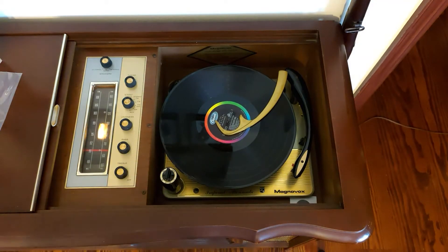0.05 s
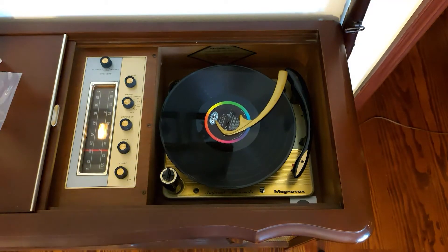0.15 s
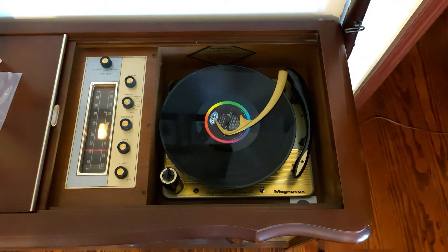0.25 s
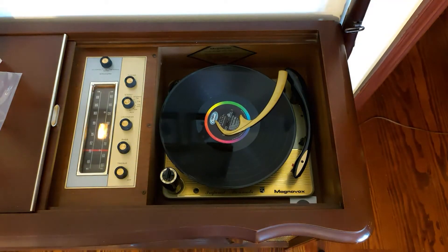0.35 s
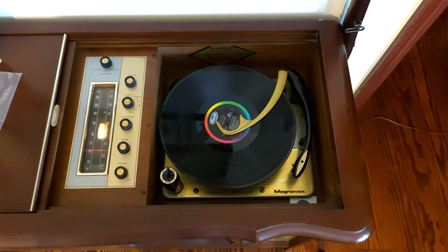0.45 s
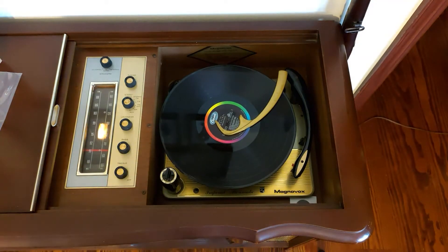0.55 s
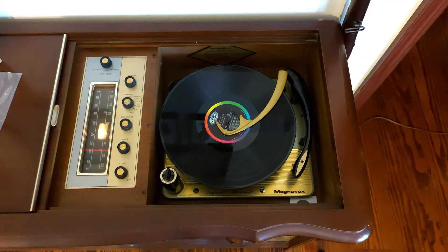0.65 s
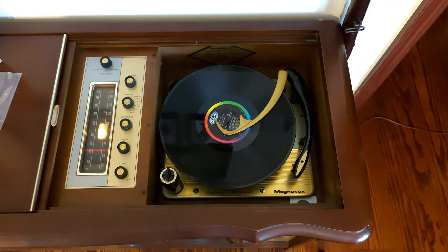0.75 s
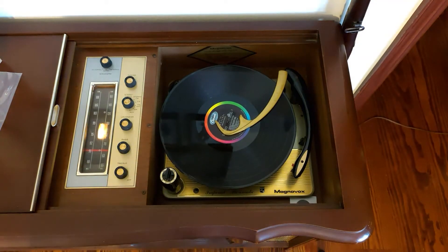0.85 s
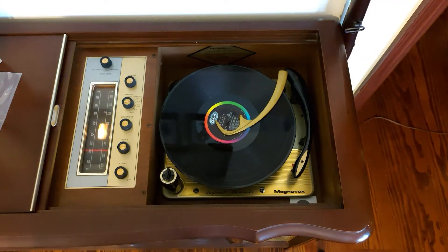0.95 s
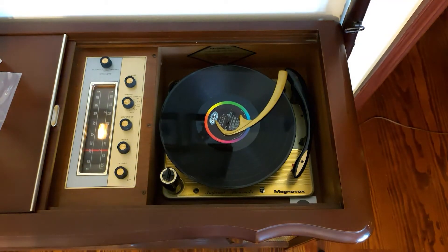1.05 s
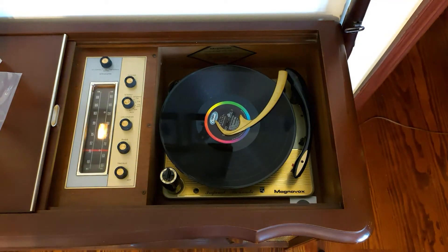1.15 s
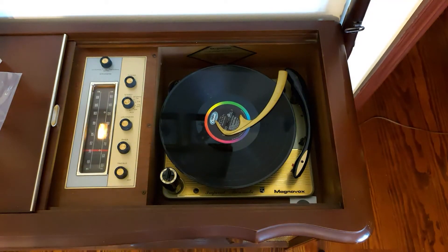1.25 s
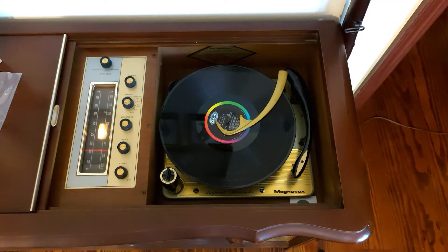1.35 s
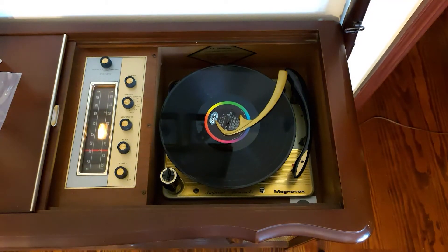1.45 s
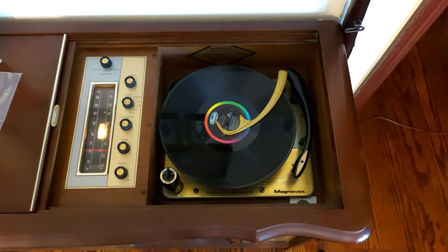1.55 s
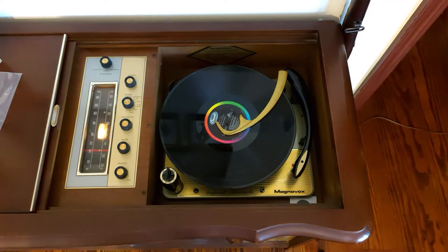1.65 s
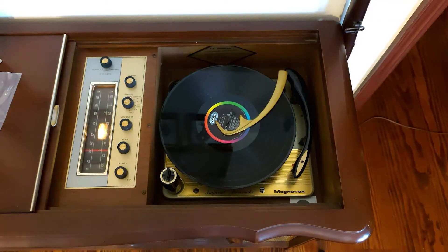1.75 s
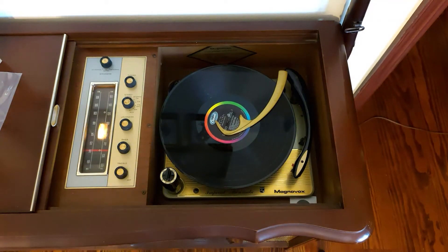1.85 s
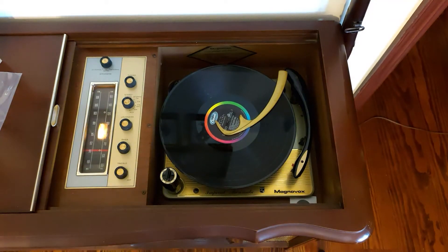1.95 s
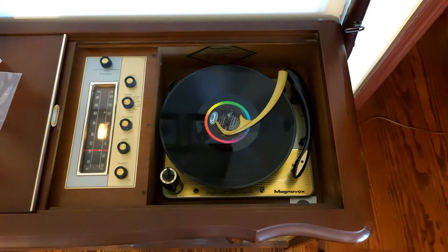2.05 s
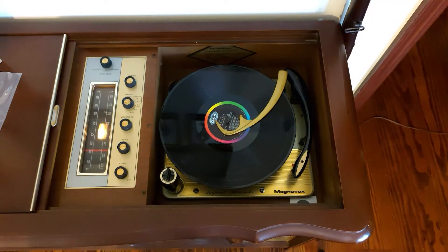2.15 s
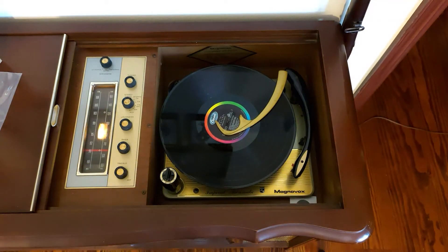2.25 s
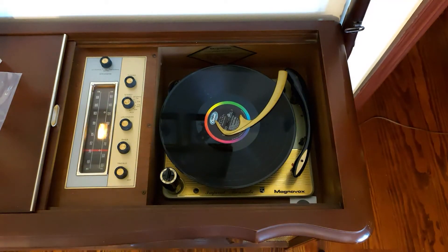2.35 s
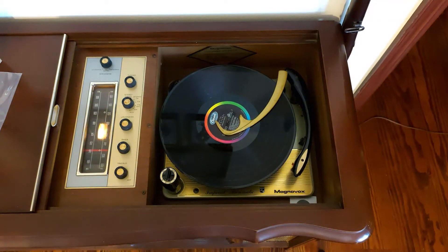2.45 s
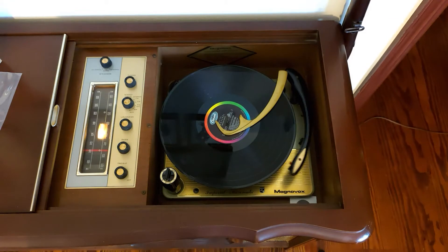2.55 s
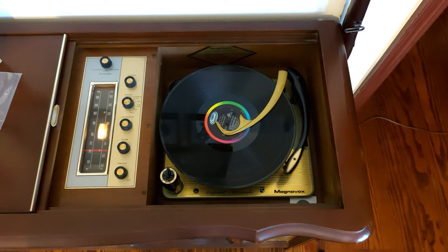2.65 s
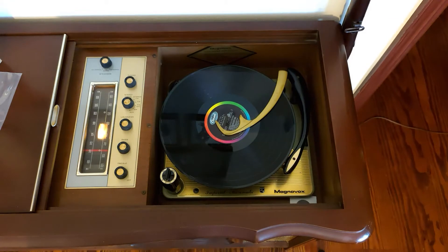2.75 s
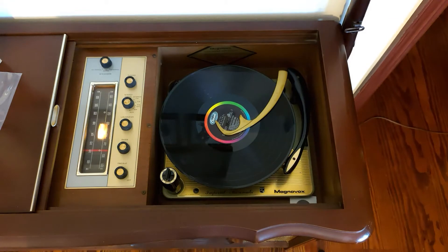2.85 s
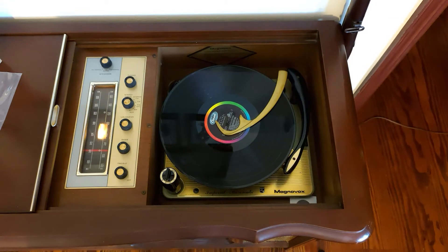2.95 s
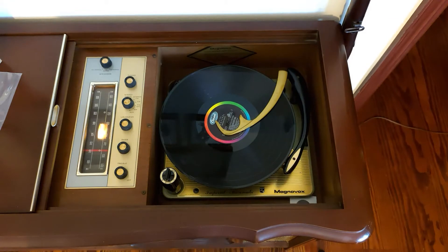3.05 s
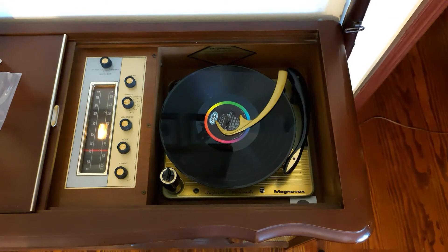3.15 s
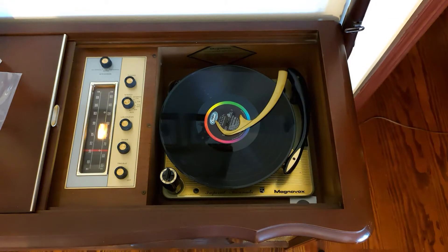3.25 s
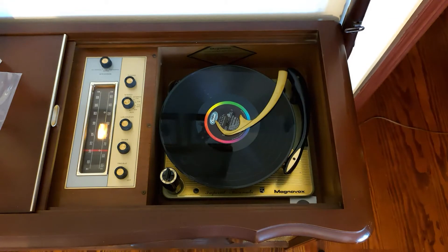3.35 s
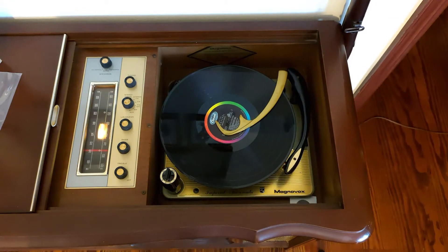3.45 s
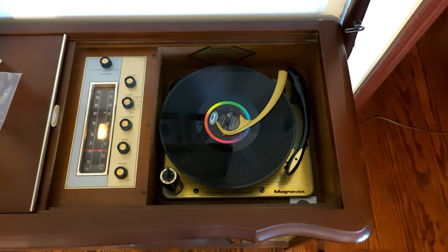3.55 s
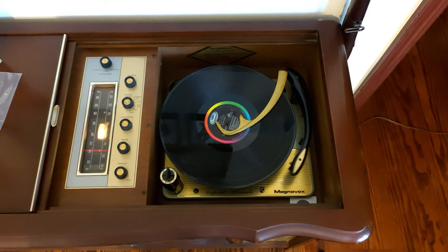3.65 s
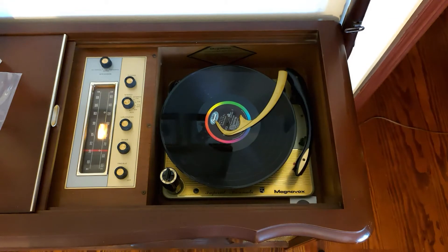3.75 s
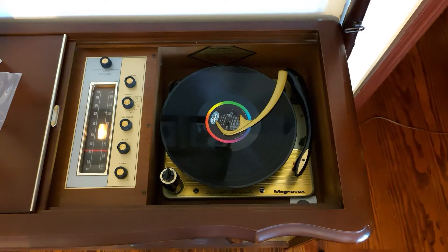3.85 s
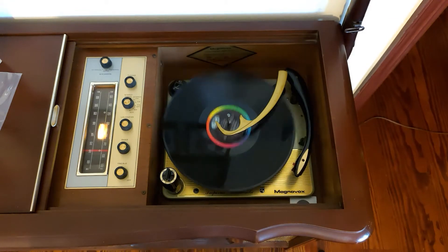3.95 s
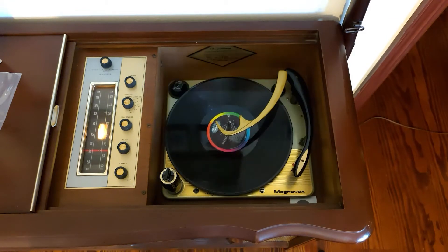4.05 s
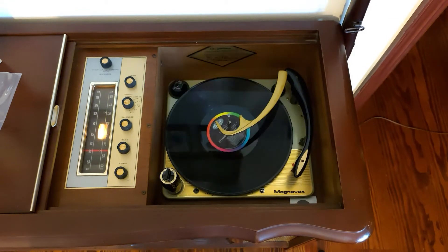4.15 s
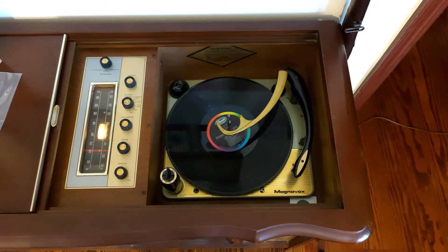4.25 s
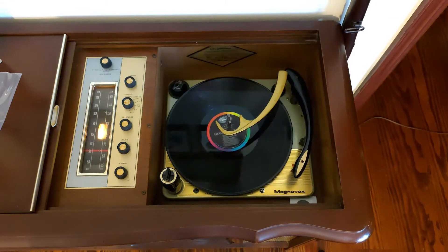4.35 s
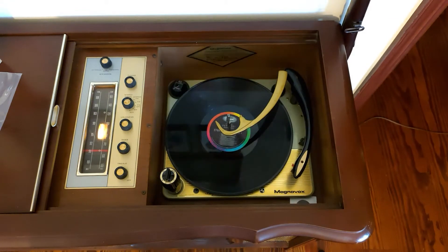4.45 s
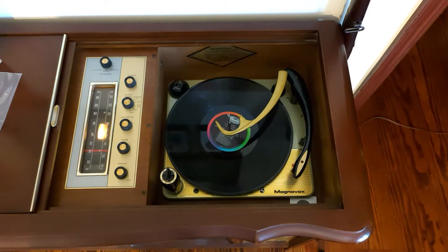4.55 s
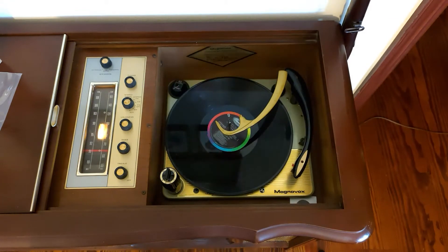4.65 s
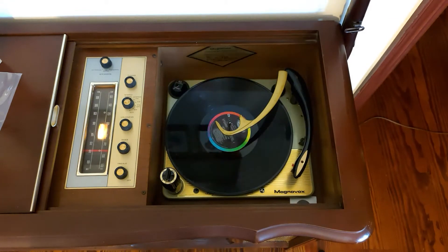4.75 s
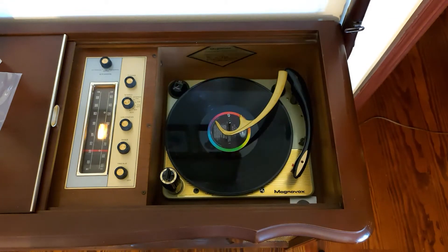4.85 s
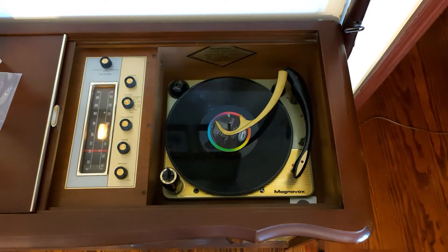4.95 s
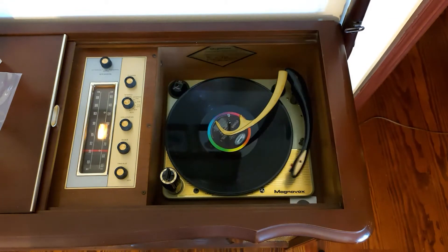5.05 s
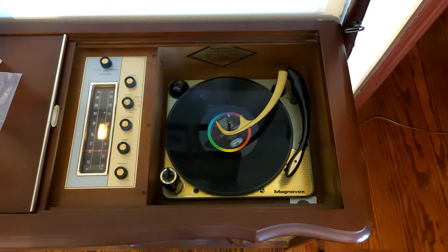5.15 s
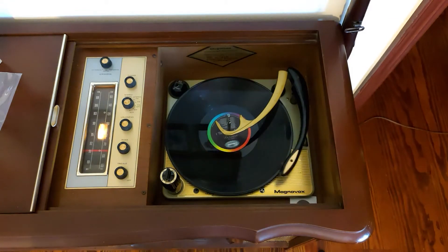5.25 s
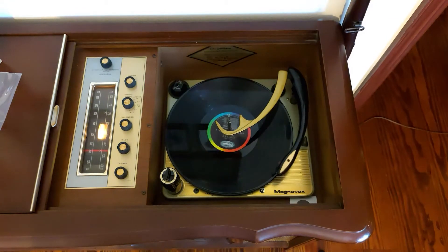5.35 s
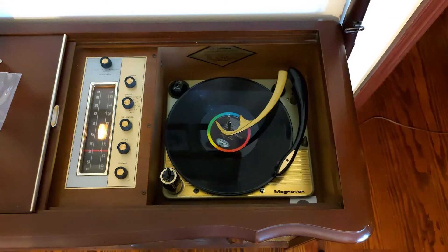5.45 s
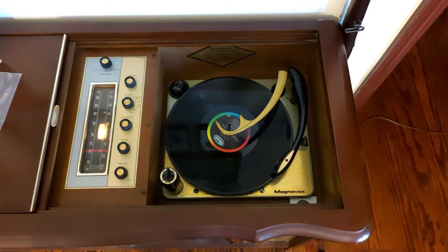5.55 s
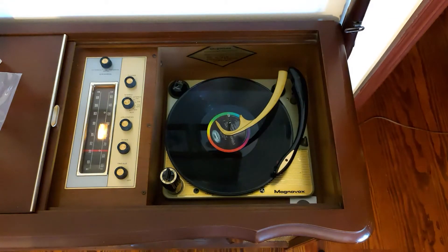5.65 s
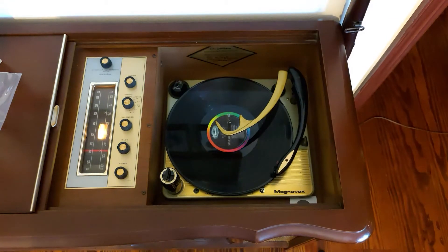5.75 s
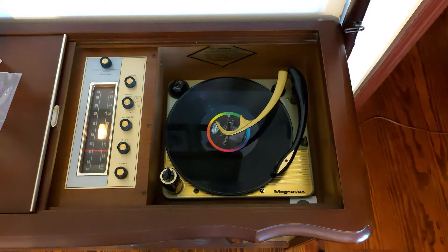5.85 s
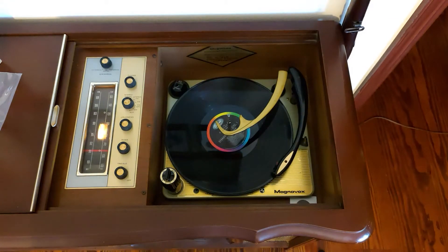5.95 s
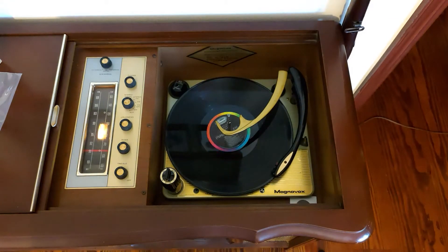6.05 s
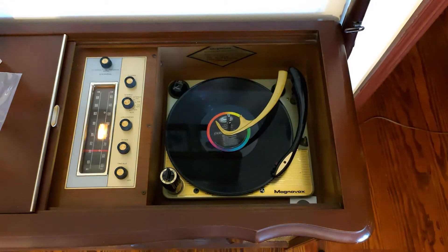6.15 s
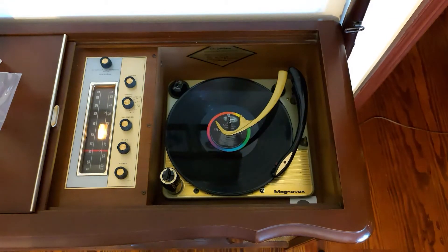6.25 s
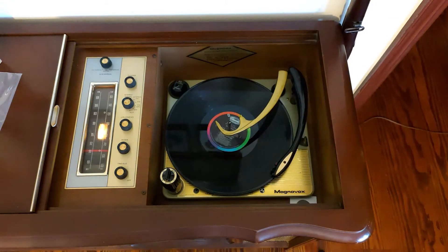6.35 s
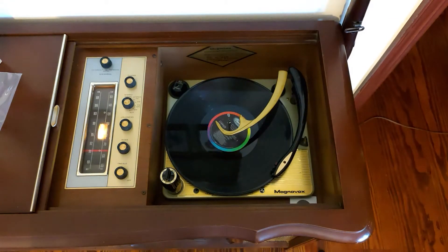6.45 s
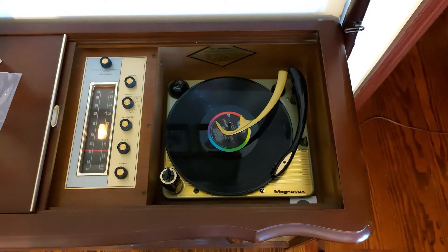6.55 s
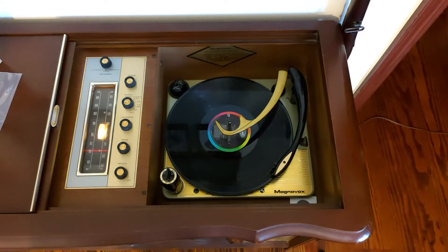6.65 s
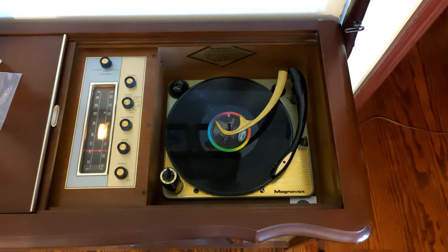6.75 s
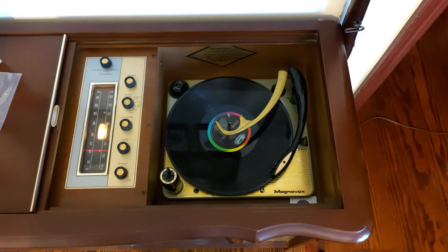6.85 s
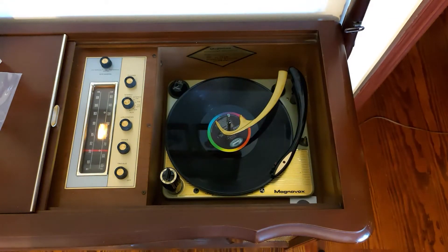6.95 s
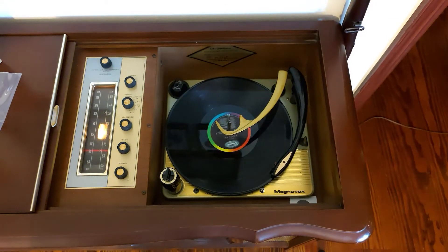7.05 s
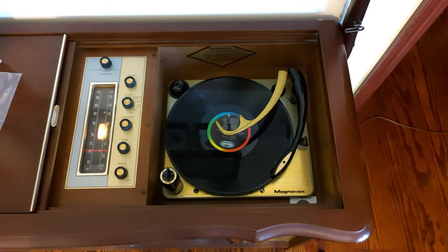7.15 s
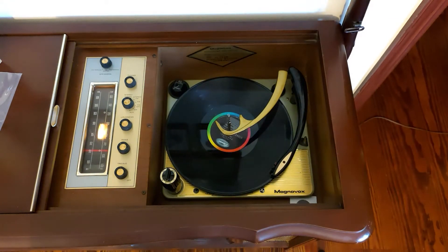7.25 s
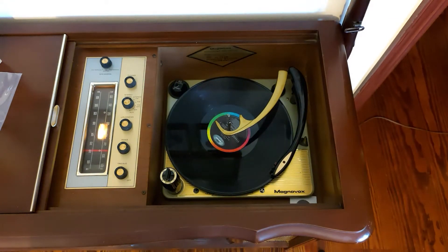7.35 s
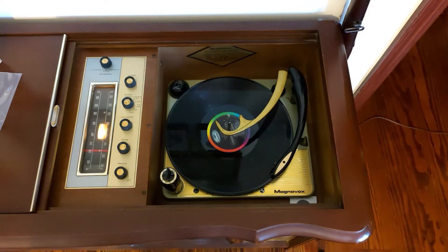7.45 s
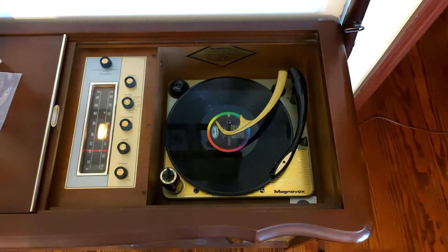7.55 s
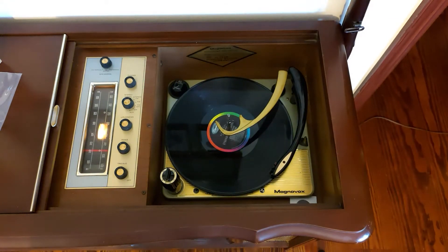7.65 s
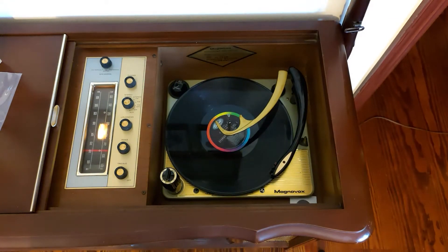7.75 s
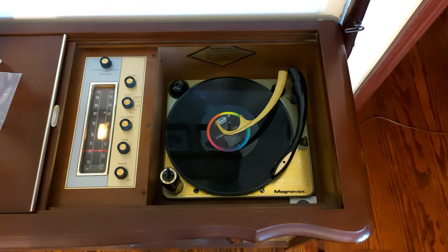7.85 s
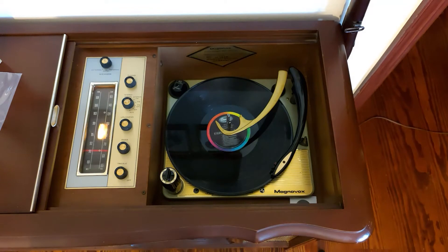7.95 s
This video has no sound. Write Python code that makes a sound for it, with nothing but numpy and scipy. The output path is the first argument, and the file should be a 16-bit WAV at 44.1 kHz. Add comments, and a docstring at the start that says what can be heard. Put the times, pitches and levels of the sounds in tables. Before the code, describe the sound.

Faint hiss and low electrical hum fill a quiet room, heard from just above an open console stereo. At about 2.3 seconds a knob clicks softly and a very faint motor hum joins. A lever clunks at 2.8 seconds, followed by light ticks and faint sliding friction inside the record changer. Around 4 seconds a short squeak leads straight into a loud, sharp latch snap that rattles and rings briefly in the steel deck. Soft lever knocks and ticks follow, clustered between 5.1 and 5.6 seconds. At about 6.2 seconds a record drops onto the platter with a deep, quick double thud and slap, the heaviest sound. After a tiny squeak, the needle lands at 7.2 seconds, clicking and hopping a few times into the groove. The loudspeakers give a low rumble that swells and settles, with faint crackle, until the end near 8 seconds.

```python
"""Faint hiss and mains hum fill a quiet room, heard from just above an old open console stereo.
A knob clicks and the motor hums; in the record changer, levers tick, a cam slides and pivots squeak.
A sprung latch snaps against the steel deck and a record thuds onto the platter: each impact excites
the damped modes of the part it strikes. Then the stylus lands and skids into the groove,
and the loudspeakers rumble with the lead-in."""
import sys
import numpy as np
from scipy import signal
from scipy.fft import rfft, irfft, next_fast_len
from scipy.io import wavfile
from scipy.ndimage import uniform_filter1d

SR = 44100
rng = np.random.default_rng(int(sys.argv[2]) if len(sys.argv) > 2 else 0)


def transcribe(u):
    """Save the signal u as a 16-bit wav file named by the first command-line argument.

    u: samples, shape (n,) or (channels, n), limited to [-1, 1]; the rate is SR.
    q: integer samples, one column per channel.
    """
    v = np.clip(np.atleast_2d(u).T, -1, 1)
    q = np.round(v * 32767).astype(np.int16)
    wavfile.write(sys.argv[1], SR, q)


N = 352359
TIME = np.arange(N) / SR
AGE = TIME[:32768]  # time since an impact, t/s

# spectrum of still room air and microphone hiss: f/Hz, level/dB
AIR_SPECTRUM = [(15, -61), (25, -29.5), (53, -11.5), (86, -19.5), (113, -2), (148, -9), (189, -0.5),
                (205, -13), (248, -0.5), (324, -10), (486, -11), (587, -11), (637, -11.5), (8490, -30.5),
                (15800, -24.5)]
# reverberation time of the room: f/Hz, t60/s
ROOM_DECAY = [(90, 0.64), (250, .42), (700, 0.45), (1500, 0.41), (4000, 0.42), (12000, 0.3)]
# line spectra of the mains and of the motor: f/Hz, level/dB
MAINS_LINES = [(119.5, -83), (178.5, -86.5), (241, -86.5), (479.5, -85.5)]
MOTOR_PARTIALS = [(59.2, -10.5), (120, -15), (178.8, 1.5), (299, -11.5), (538.3, -8.5)]
# light ticks of pawl and tone arm: t/s, level/dB, centre f/Hz
PAWL_TICKS = [(0.287, -65, 2700), (1.195, -76, 2200), (3.0, -58.5, 1800), (3.734, -69.5, 5640),
              (3.761, -65.5, 2800), (4.344, -73, 9500), (5.091, -67, 2200), (5.592, -65, 2200),
              (6.18, -64.5, 10000), (6.263, -60.5, 9800), (6.547, -57.5, 2460), (6.556, -51, 2230),
              (6.5576, -52, 7360), (6.659, -66, 2520), (7.0987, -62.5, 1960)]
# strokes of the cam follower: t/s, duration/s, final level/dB
CAM_STROKES = [(2.905, .47, -62.5), (3.7, .24, -69), (3.978, .11, -52), (5.13, .2, -63)]
# resonances of the sliding cam: f/Hz, bandwidth/Hz, level/dB
CAM_RESONANCES = [(269, 130, 0), (605.3, 120, -0.5), (1106, 34, 4), (1266, 80, -5.5), (1640, 88, -5.5)]
# squeaks of dry pivots: t/s, duration/s, start f/Hz, end f/Hz, level/dB
PIVOT_SQUEAKS = [(3.412, 0.013, 1570, 1470, -63.5), (3.574, 0.038, 787, 789, -65),
                 (3.975, 0.025, 804.6, 814, -40.5), (3.983, 0.018, 993, 963, -49),
                 (3.993, .07, 791.6, 711, -49), (7.095, 0.065, 2850, 2810, -64.5),
                 (7.762, 0.067, 3370, 3470, -65.5)]
# the switch snaps over and settles: t/s, level/dB
KNOB_IMPACTS = [(2.2518, -50.5), (2.259, -57.5), (2.288, -60.5)]
# lever knocks: t/s, level/dB, weight as bass lift/dB, hardness as treble lift/dB
LEVER_IMPACTS = [(0.284, -61.5, -13, -11), (2.364, -60, -8, 0), (2.768, -39, -5.5, -9.5),
                 (2.778, -42.5, 0.5, -1.5), (2.941, -66, 0, 13.5), (3.762, -57.5, -4, -3.5),
                 (3.817, -62.5, 4, 9), (3.899, -63.5, 2, -0.5), (4.539, -57.5, 3, -5.5),
                 (5.105, -63.5, 7, 14), (5.172, -54, 2.5, 10), (5.203, -49, 18.5, 7),
                 (5.212, -47.5, -2, -7.5), (5.312, -56, -8, 13), (5.333, -49.5, -4, -10),
                 (5.585, -61.5, -5, 5.5)]
# the stylus lands and hops: t/s, skid duration/s, click level/dB, rumble level/dB, rumble t60/s
STYLUS_LANDINGS = [(7.224, 0.0069, -46.5, -36.5, 1), (7.325, 0.023, -42, -28.5, 0.44),
                   (7.436, 0.0035, -54, -38, 0.56), (7.634, 0.0074, -68, -37.5, 0.18)]
# the latch hits its stop and rebounds: t/s, level/dB
LATCH_IMPACTS = [(4.0868, -19.5), (4.0976, -18), (4.104, -30.5), (4.1146, -29.5), (4.122, -30.5)]
# the record lands, rocks and lands again: t/s, thud level/dB, slap level/dB
RECORD_IMPACTS = [(6.1529, -14, -31), (6.1604, -18, -28), (6.2361, -24, -31.5), (6.243, -16.5, -29.5)]
# normal modes of switch, linkage, steel deck, latch spring and mounted platter: f/Hz, level/dB, t60/s
SWITCH_MODES = [(612, -12.5, 0.36), (1580, -7, 0.19), (2520, 1, 0.1), (2444, 0, 0.078), (2770, 3, 0.11),
                (4590, -10, 0.25), (10400, 3, 0.065), (11100, 7, .06), (12600, -10, 0.046),
                (12600, 12.5, .05)]
LINKAGE_MODES = [(131.5, -3.5, 0.33), (202, -11.5, 0.12), (283, 0.5, 0.12), (385, -3.5, .2),
                 (493, 7.5, 0.15), (638, 1.5, 0.36), (765, -10.5, 0.12), (1122, -1.5, .33),
                 (1200, -1.5, 0.19), (1337, -7, 0.12), (1520, -12.5, 0.13), (1616, -8.5, 0.65),
                 (2262, -14.5, 0.092), (2810, -12, .2)]
DECK_MODES = [(272, -2.5, .26), (352, -6, .3), (468, -8.5, 0.39), (545, -6.5, .24), (690, -14.5, 0.43),
              (755, -9.5, 0.3), (810, -2, .38), (887, -5.5, 0.28), (977.7, -3, 0.29), (997, -1, .34),
              (1048.5, 3, .28), (1146, -0.5, .33), (1215, -4, 0.2), (1298, -1.5, 0.35), (1450, -6, 0.2),
              (1530, -10, 0.33), (1602, -5.5, .3), (1740, -13, 0.34), (1890, -11.5, .33),
              (2040, -10.5, 0.35), (2098, -6, 0.36), (2240, -10, .25), (2410, -12, 0.37),
              (2960, -14.5, 0.21), (3320, -18, 0.23)]
SPRING_MODES = [(10100, -1, .2), (9840, -3.5, .22), (10200, 0, .3), (10330, -2.5, .24), (10550, -7, .16)]
PLATTER_MODES = [(66, -1, 0.15), (92.2, 8.5, 0.3), (112, -13, .15), (137, -6.5, 0.13), (163, -12.5, 0.39),
                 (244.4, -7.5, 0.29), (283.3, -8.5, 0.53), (391, -10, 0.22), (440, -7, 0.32),
                 (492, -2, .13), (633, -12, 0.24), (690, -22.5, 0.34)]
# spectra of the contacts: f/Hz, level/dB
TICK_SPECTRUM = [(200, -10), (1500, 4.5), (15000, -13)]
KNOB_SPECTRUM = [(180, -51), (300, -24), (620, -3), (708, -23), (877, -5), (1540, -12), (1970, -12.5),
                 (2520, -0.5), (3020, -9), (5950, -11), (8560, -15), (12300, -10), (15500, -13)]
LEVER_SPECTRUM = [(50, -15), (100, 6), (300, 7), (600, 5), (1650, -6.5), (2000, -9), (2700, -9.5),
                  (3600, -15.5), (6500, -20.5), (8400, -28.5), (10500, -20.5), (15000, -25)]
STYLUS_SPECTRUM = [(240, -32.5), (400, -3), (623, -0.5), (715, -3.5), (928, -0.5), (1080, -12.5),
                   (1280, 3.5), (1380, -4), (2430, -2), (8670, -15), (10600, -8.5), (15500, -20)]
LATCH_SPECTRUM = [(35, -61), (60, -38), (100, -17.5), (210, -18.5), (272, -3), (343, -16.5), (400, -5),
                  (560, -7), (1020, -1.5), (2400, -8.5), (4200, -20.5), (5100, -29), (6500, -28),
                  (8300, -30.5), (10200, -23), (15500, -36)]
SLAP_SPECTRUM = [(150, -32), (280, 2), (340, -11), (400, 1), (500, 0.5), (740, -4.5), (880, -12),
                 (1110, -8), (1300, -18.5), (1800, -14.5), (3400, -20), (6600, -38.5), (7600, -47.5),
                 (10000, -46), (15500, -64)]
# spectra of cam grit, groove rumble and surface noise: f/Hz, level/dB
GRIT_SPECTRUM = [(200, -3), (700, 1.5), (2000, -3), (3300, -5), (5000, -14.5), (10500, -17.5), (15000, -25)]
RUMBLE_SPECTRUM = [(29, -49.5), (50, -33), (59, -25), (80, -6), (129, 6), (182, 0), (210, -8), (253, -2.5),
                   (280, -4.5), (338, -30), (481, -30), (537, -32), (627, -19), (700, -41), (910, -59),
                   (1540, -120)]
SURFACE_SPECTRUM = [(210, -28), (350, -10.5), (479, 0.5), (535, -10.5), (616, -5), (721, -20), (1190, -19),
                    (1510, -20.5), (3420, -19), (4200, -31), (8520, -45), (15000, -35)]
# treble response of the microphone: f/Hz, gain/dB
MICROPHONE_DIP = [(6800, 0), (7800, -5.5), (8700, -9.5), (9700, -1)]


def undb(db):
    """Amplitude ratio of a level: a factor of ten per 20 dB."""
    return 10 ** (np.asarray(db) / 20)


def unit(x):
    """Power normalisation to rms 1."""
    return x / np.sqrt(np.mean(x ** 2))


def burst(x):
    """Energy normalisation of a transient to that of 30 ms at rms 1."""
    return x / np.sqrt(np.sum(x ** 2) / (0.03 * SR))


def at_hz(points, hz):
    """Interpolation of (f/Hz, value) points on a logarithmic frequency axis."""
    f, value = np.transpose(points)
    return np.interp(np.log(np.maximum(hz, 1)), np.log(f), value)


def tint(x, spectrum):
    """Minimum-phase filter with gains (f/Hz, level/dB); folding the cepstrum makes it causal."""
    n = 2 * next_fast_len(len(x))
    gain = undb(at_hz(spectrum, np.fft.rfftfreq(n, 1 / SR)))
    cepstrum = irfft(np.log(gain))
    cepstrum[1:n // 2] *= 2
    cepstrum[n // 2 + 1:] = 0
    return irfft(rfft(x, n) * np.exp(rfft(cepstrum)))[:len(x)]


def band(x, low_hz, high_hz, order=2):
    """Maximally flat band-pass filter."""
    edges = [low_hz, min(high_hz, SR / 2 - 1)]
    return signal.sosfilt(signal.butter(order, edges, "band", fs=SR, output="sos"), x)


def walk(per_s):
    """Random modulation: straight lines between normal deviates, with spread near 1."""
    knots = rng.standard_normal(int(TIME[-1] * per_s) + 2)
    return np.interp(TIME * per_s, np.arange(len(knots)), knots)


def add(out, t, x):
    """Superposition of a sound that starts at t seconds."""
    start = int(t * SR)
    out[start:start + len(x)] += x[:N - start]


def ring(modes):
    """Free vibration: damped modes of alternating sign, varying a little in level and pitch per blow."""
    hz, db, t60 = np.transpose(modes)[:, :, None]
    scatter_db, detune = rng.standard_normal((2, len(modes), 1))
    polarity = (-1) ** np.arange(len(modes))[:, None]
    phase = 2 * np.pi * hz * (1 + 0.001 * detune) * AGE
    amplitude = undb(db + scatter_db - 60 * AGE / t60)
    return burst(np.sum(polarity * amplitude * np.sin(phase), axis=0))


def echoes():
    """Diffuse reverberation of cabinet and room: noise that decays faster in the treble."""
    hz, t, noise = signal.stft(rng.standard_normal(len(AGE)), SR, nperseg=512)
    decay = undb(-60 * t / at_hz(ROOM_DECAY, hz)[:, None])
    tail = signal.istft(noise * decay, SR)[1][:len(AGE)]
    return burst(tail * (1 - np.exp(-AGE / 0.001)))


def contact(spectrum, decay_s, room_db):
    """Source and filter: a brief crack and its reflections take the spectrum of the struck part."""
    crack = burst(rng.standard_normal(len(AGE)) * np.exp(-AGE / decay_s))
    excitation = crack + undb(room_db) * echoes()
    # a hard blow feeds all broad bands evenly, so the excitation is flattened
    hz = np.fft.rfftfreq(len(AGE), 1 / SR)[1:]
    power = np.abs(rfft(excitation)[1:]) ** 2
    gain_db = at_hz(spectrum, hz) - 10 * np.log10(uniform_filter1d(power, size=130))
    return burst(tint(excitation, np.column_stack([hz, gain_db])))


def hum(lines, waver_db):
    """A line spectrum with slow random modulation of amplitude and phase."""
    out = np.zeros(N)
    for hz, db in lines:
        phase = 2 * np.pi * hz * TIME + 0.4 * walk(per_s=4)
        out += np.sqrt(2) * undb(db + waver_db * walk(per_s=8.9)) * np.sin(phase)
    return out


def background(spin_up_s=0.2):
    """The noise floor: broadband air, mains hum and a motor hum that fades in with the switch."""
    air = undb(-67) * unit(tint(rng.standard_normal(N), AIR_SPECTRUM))
    mains = hum(MAINS_LINES, waver_db=0.5)
    running = np.clip((TIME - KNOB_IMPACTS[0][0]) / spin_up_s, 0, 1)
    motor = undb(-75) * running * hum(MOTOR_PARTIALS, waver_db=5)
    return air + mains + motor


def ticks(reference_db=-65, doubling_db=8):
    """Light impacts radiate band-limited clicks; the harder the impact, the wider the band."""
    out = np.zeros(N)
    for t, db, centre_hz in PAWL_TICKS:
        width_hz = 0.37 * centre_hz * 2 ** ((db - reference_db) / doubling_db)
        low_hz = np.hypot(centre_hz, width_hz / 2) - width_hz / 2  # centre is the geometric mean
        click = contact(TICK_SPECTRUM, decay_s=0.004, room_db=-7)
        add(out, t, undb(db) * burst(band(click, low_hz, low_hz + width_hz, order=1)))
    return out


def stroke(t, duration, attack_s=0.0067, swell_db=5.5, release_s=0.033):
    """Spring loading: the follower takes hold, presses ever harder, then lets go."""
    age = TIME - t
    attack = np.clip(age / attack_s, 0, 1)
    swell = undb(swell_db * (np.clip(age / duration, 0, 1) - 1))
    release = np.exp(-np.maximum(age - duration, 0) / release_s)
    return attack * swell * release


def cam(grip_spread_db=2):
    """Sliding friction: tiny slips of the cam follower drive resonances, over a fine dry grit."""
    slips = rng.standard_normal(N) * undb(2 * walk(per_s=67))
    body = sum(undb(db) * band(slips, hz - width / 2, hz + width / 2) for hz, width, db in CAM_RESONANCES)
    grit = tint(slips, GRIT_SPECTRUM)
    pressure = sum(undb(db) * stroke(t, duration) for t, duration, db in CAM_STROKES)
    grip = undb(grip_spread_db * walk(per_s=20))
    return pressure * grip * (unit(body) + undb(-5) * unit(grit))


def squeaks():
    """Stick-slip oscillation of dry pivots: short unsteady glides and their reflections."""
    direct = np.zeros(N)
    for t, duration, start_hz, end_hz, db in PIVOT_SQUEAKS:
        progress = np.minimum(AGE / duration, 1)
        jitter = walk(per_s=start_hz / 2)[:len(AGE)]  # the grip changes every other cycle
        hz = (start_hz + (end_hz - start_hz) * progress) * (1 + 0.09 * jitter)
        phase = 2 * np.pi * np.cumsum(hz) / SR
        swell = 4 * np.sqrt(progress) * (1 - progress)
        add(direct, t, undb(db) * swell * (np.sin(phase) + undb(-26.5) * np.sin(2 * phase)))
    room = echoes()
    return direct + undb(-6.5) * signal.fftconvolve(direct, room / np.linalg.norm(room))[:N]


def knob():
    """Snap action: the power switch flips over, and each impact excites its modes."""
    out = np.zeros(N)
    for t, db in KNOB_IMPACTS:
        click = contact(KNOB_SPECTRUM, decay_s=0.014, room_db=-7)
        add(out, t, undb(db) * (click + undb(1.5) * ring(SWITCH_MODES)))
    return out


def levers():
    """Mass and hardness shape an impact: heavy links give bass, hard edges give treble and ring."""
    out = np.zeros(N)
    for t, db, weight_db, hardness_db in LEVER_IMPACTS:
        knock = contact(LEVER_SPECTRUM, decay_s=0.007, room_db=-4.5)
        linkage = undb(0.18 * hardness_db - 0.5) * ring(LINKAGE_MODES)
        shelves = [(170, weight_db), (330, 0), (700, 0),
                   (2400, hardness_db), (10500, hardness_db - 4), (15000, hardness_db - 8)]
        add(out, t, undb(db) * tint(burst(knock + linkage), shelves))
    return out


def stylus(step_s=0.01, rise_db=3, rebound_s=0.019, loss_db=14.5):
    """Inelastic rebound: the needle skids in ever harder catches, then bounces twice, ever softer."""
    out = np.zeros(N)
    for t, skid_s, click_db, _, _ in STYLUS_LANDINGS:
        steps = round(skid_s / step_s)
        skid = [(skid_s * k / steps, -rise_db * (steps - k)) for k in range(steps)]
        bounces = [(skid_s + rebound_s * k, -loss_db * k) for k in range(3)]
        for delay, db in skid + bounces:
            click = contact(STYLUS_SPECTRUM, decay_s=0.0098, room_db=-7)
            add(out, t + delay, undb(click_db + db) * click)
    return out


def arm_sway(age, rise_s, t60):
    """Damped motion: the tone arm's sway grows after a landing and decays exponentially."""
    return np.clip(age / rise_s, 0, 1) * undb(-60 * np.maximum(age - rise_s, 0) / t60)


def groove(lag_s=0.01, rise_s=0.022, steady_db=-54, surface_db=-52, settle_db_per_s=20):
    """Transduction: the loudspeakers give out rumble, swelled by each landing, and fading crackle."""
    playing_s = np.maximum(TIME - STYLUS_LANDINGS[0][0] - lag_s, 0)
    touching = np.minimum(playing_s / rise_s, 1)
    rumble = tint(rng.standard_normal(N), RUMBLE_SPECTRUM)
    rumble /= np.sqrt(uniform_filter1d(rumble ** 2, size=1800))  # the landings alone set the swell
    sway_power = sum((undb(db) * arm_sway(TIME - t - lag_s, rise_s, t60)) ** 2
                     for t, _, _, db, t60 in STYLUS_LANDINGS)
    swell = np.sqrt(undb(steady_db) ** 2 + sway_power)
    dust = rng.standard_normal(N) * undb(4.5 * walk(per_s=130))
    crackle = unit(tint(dust, SURFACE_SPECTRUM)) * undb(surface_db - settle_db_per_s * playing_s)
    return touching * (rumble * swell + crackle)


def latch():
    """Release of elastic energy: a spring throws the record pusher at the steel deck, then rings on."""
    out = np.zeros(N)
    for t, db in LATCH_IMPACTS:
        snap = contact(LATCH_SPECTRUM, decay_s=0.005, room_db=-10)
        add(out, t, undb(db) * (snap + undb(-6.5) * ring(DECK_MODES)))
    add(out, t=4.112, x=undb(-40) * ring(SPRING_MODES))
    return out


def record_drop():
    """Air-cushioned impact: the disc squeezes out a puff, the platter's modes boom, the vinyl slaps."""
    out = np.zeros(N)
    for t, thud_db, slap_db in RECORD_IMPACTS:
        puff = undb(-6) * burst(band(np.exp(-AGE / 0.0027), 140, 440, order=3))
        reflections = undb(-13.5) * burst(band(echoes(), 80, 260, order=3))
        boom = undb(-7) * ring(PLATTER_MODES)
        slap = contact(SLAP_SPECTRUM, decay_s=0.0073, room_db=-3)
        add(out, t, undb(thud_db) * (boom + puff + reflections) + undb(slap_db) * slap)
    return out


def scene():
    """Linear superposition: the pressures of all sources add at one microphone."""
    changer = knob() + levers() + ticks() + latch() + record_drop() + cam() + squeaks()
    return (changer + stylus() + groove() + background())[None]


def record(dry, bass_hz=52, top_hz=15900):
    """Frequency response of the microphone: deep bass is shed, the treble dips and the top is cut."""
    high_pass = signal.butter(5, bass_hz, "high", fs=SR, output="sos")
    low_pass = signal.ellip(10, 0.1, 70, top_hz, fs=SR, output="sos")
    dipped = tint(signal.sosfilt(high_pass, dry[0]), MICROPHONE_DIP)
    return signal.sosfilt(low_pass, dipped)[None]


dry = scene()
out = record(dry)
transcribe(out)
```